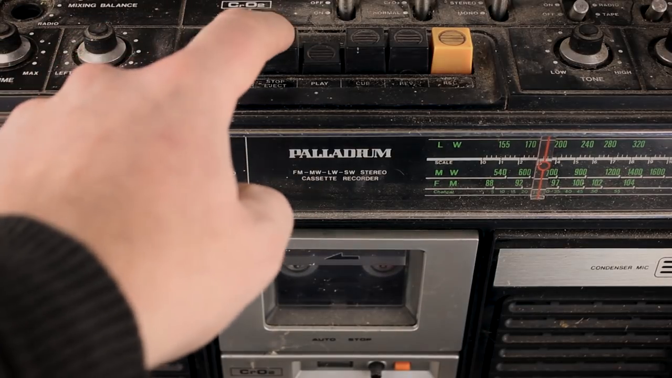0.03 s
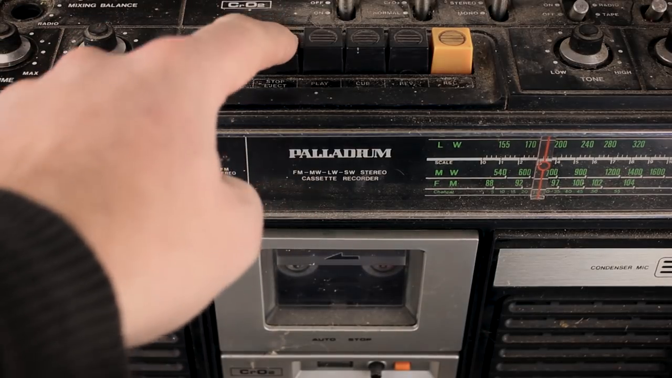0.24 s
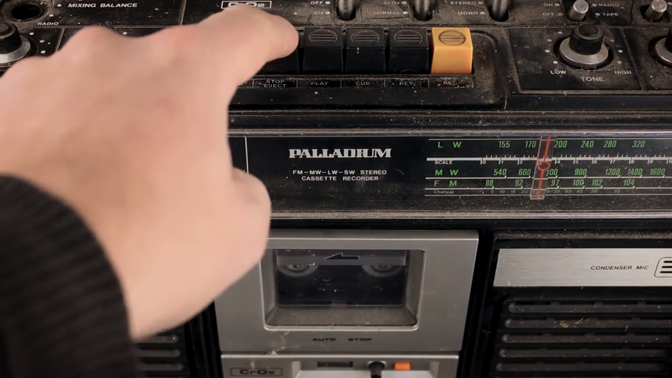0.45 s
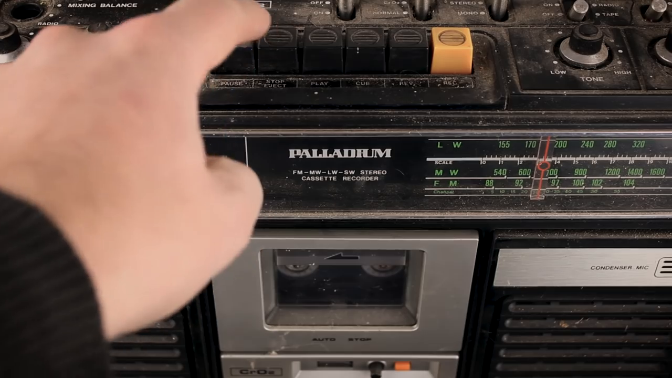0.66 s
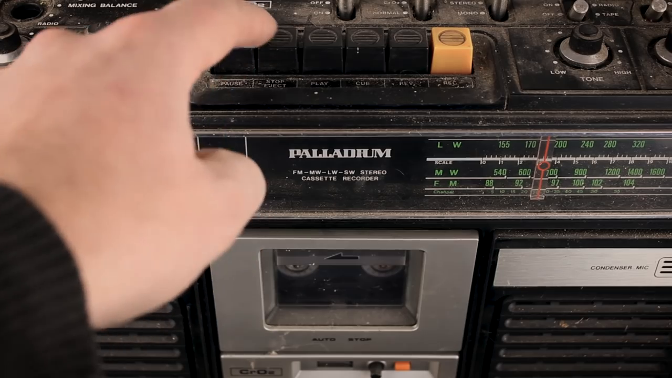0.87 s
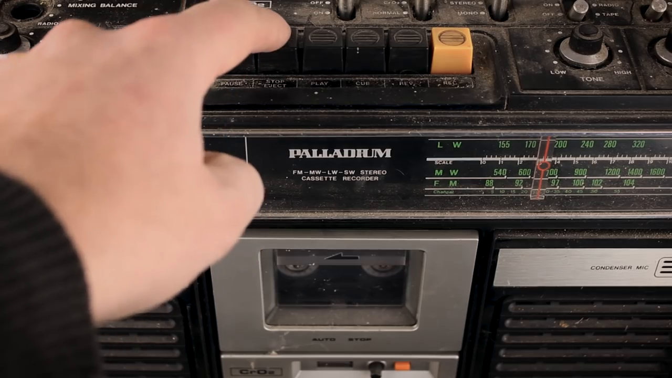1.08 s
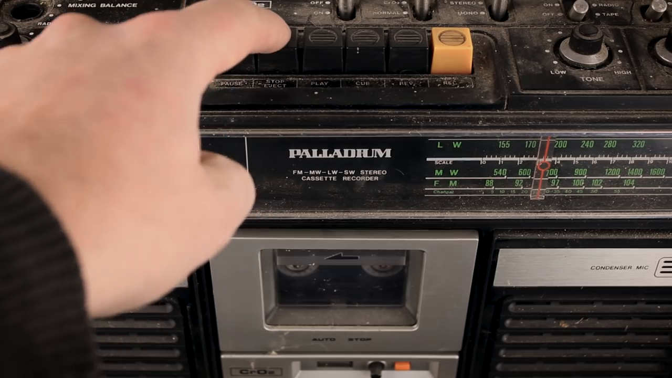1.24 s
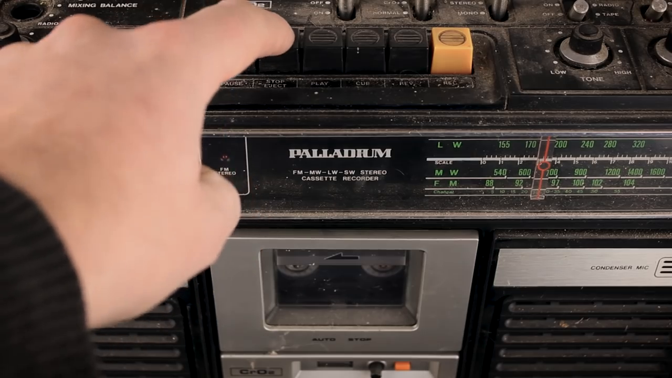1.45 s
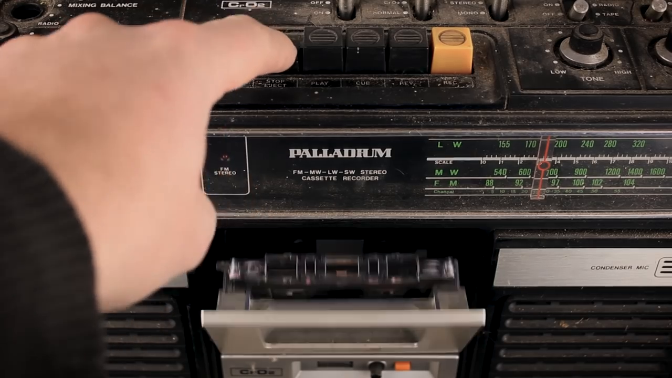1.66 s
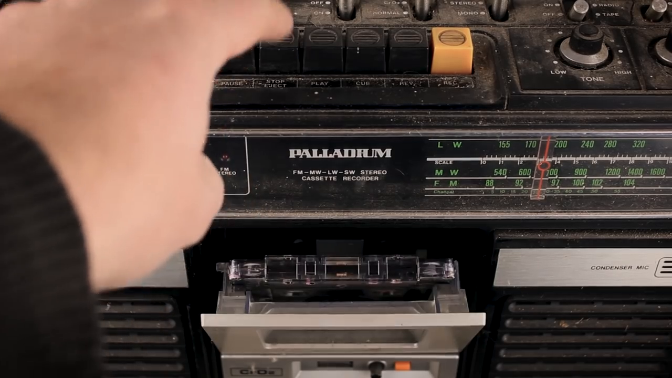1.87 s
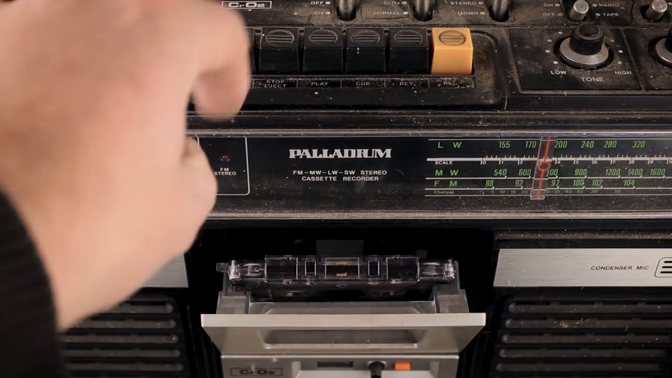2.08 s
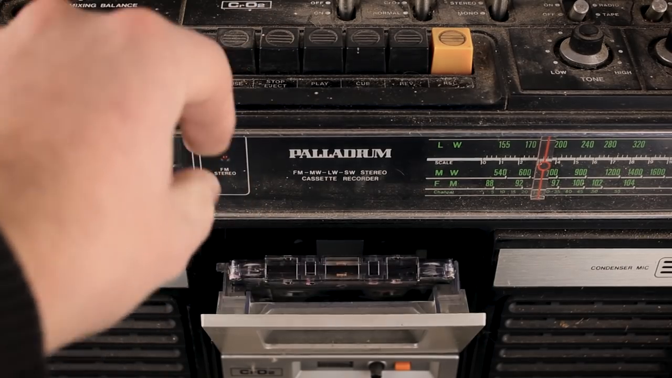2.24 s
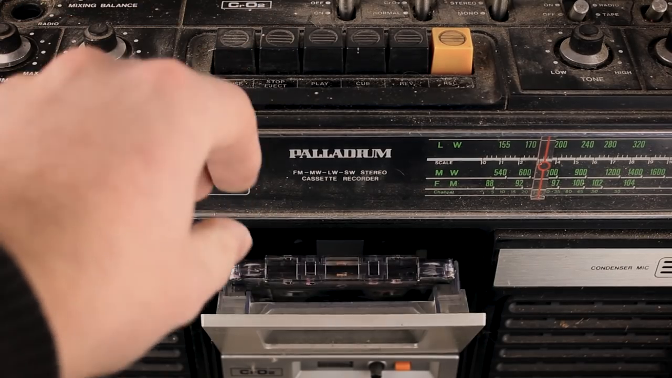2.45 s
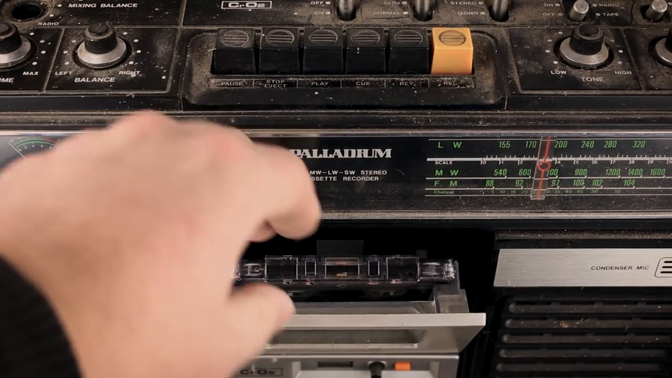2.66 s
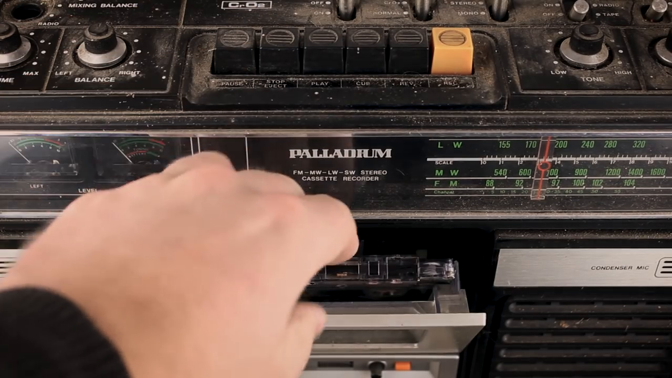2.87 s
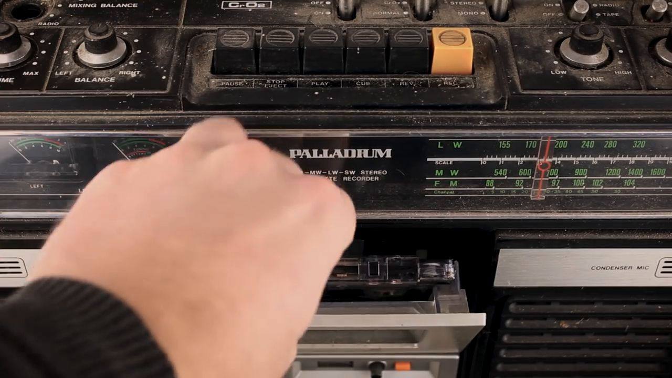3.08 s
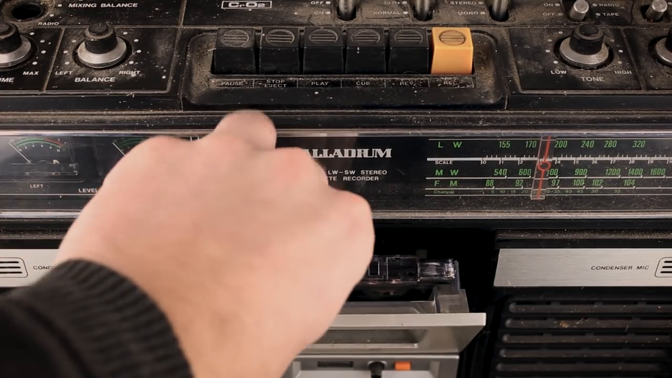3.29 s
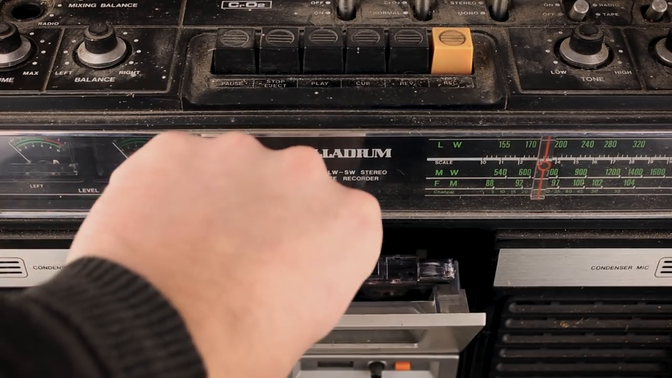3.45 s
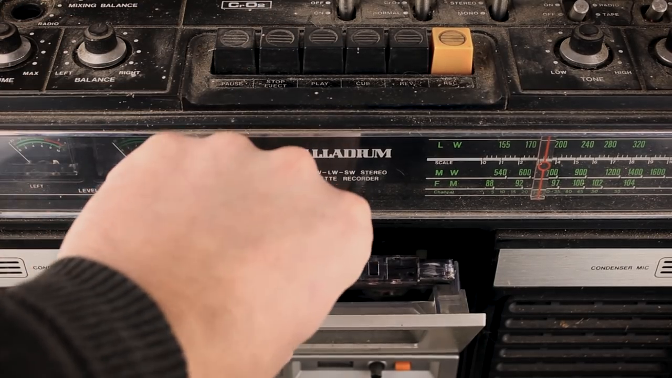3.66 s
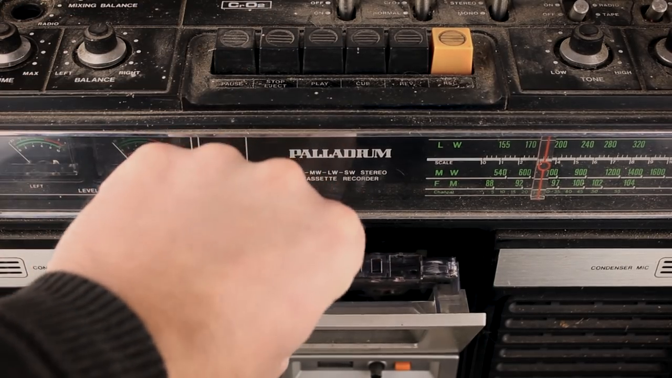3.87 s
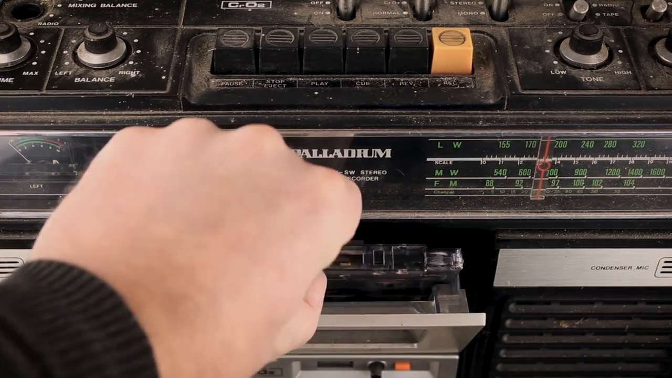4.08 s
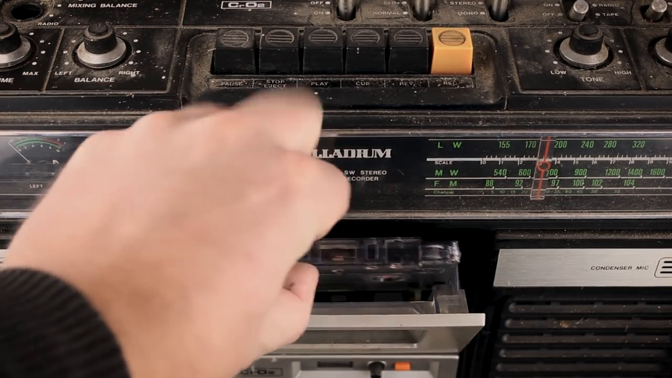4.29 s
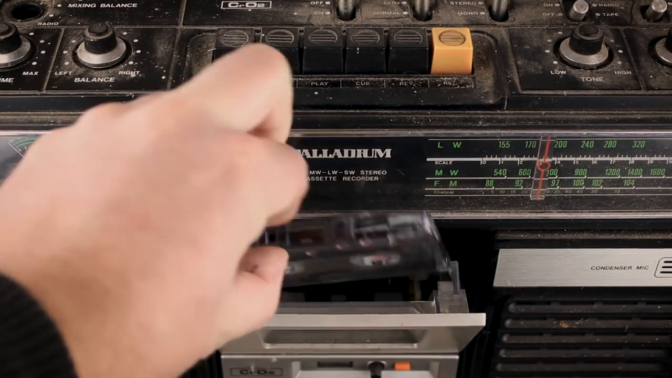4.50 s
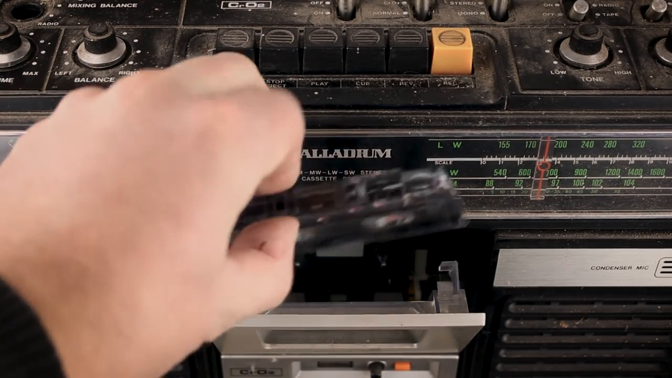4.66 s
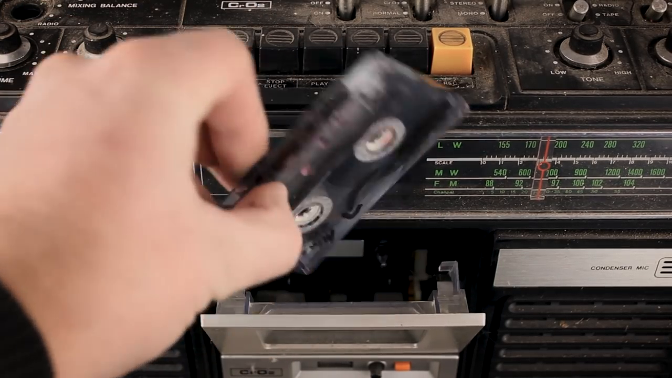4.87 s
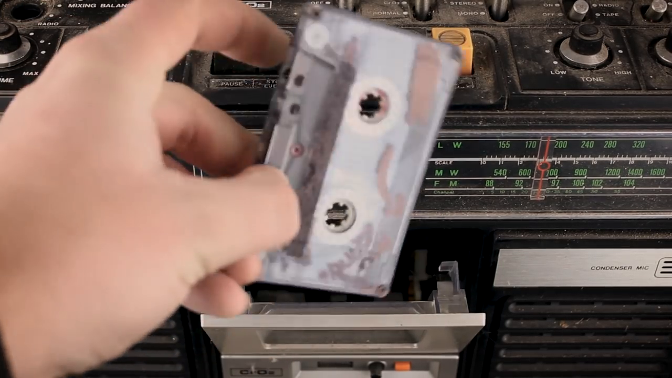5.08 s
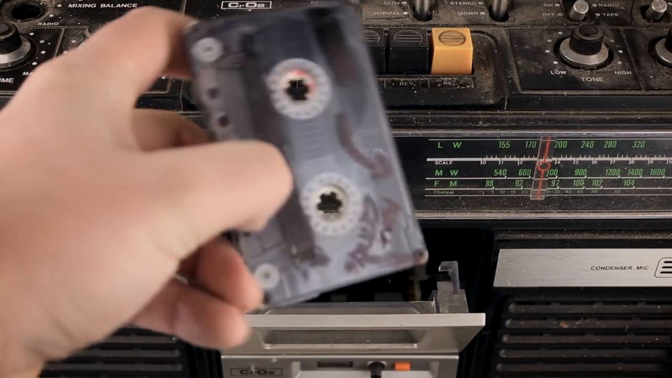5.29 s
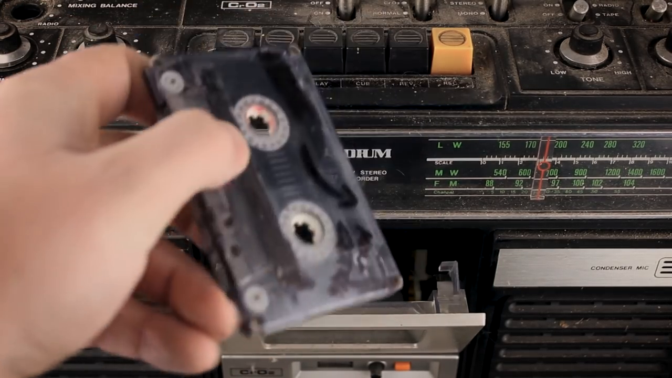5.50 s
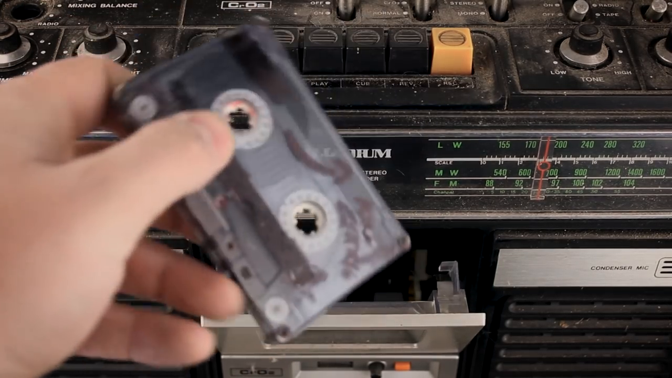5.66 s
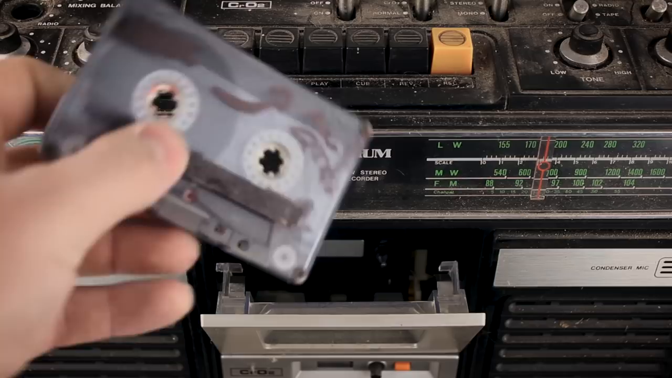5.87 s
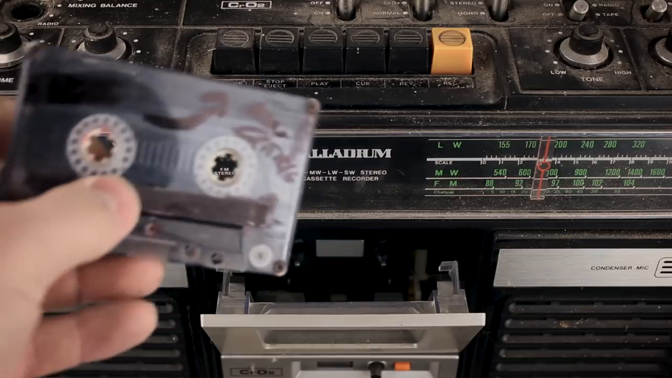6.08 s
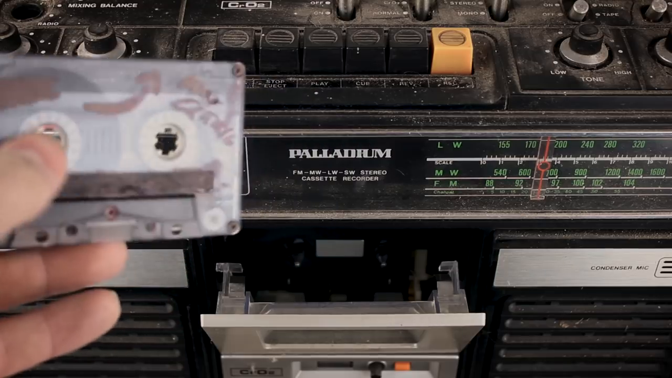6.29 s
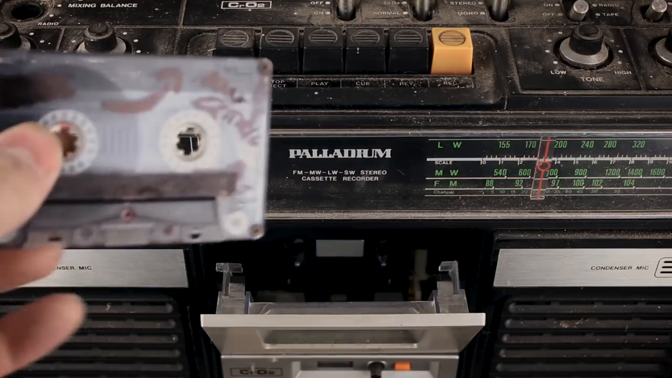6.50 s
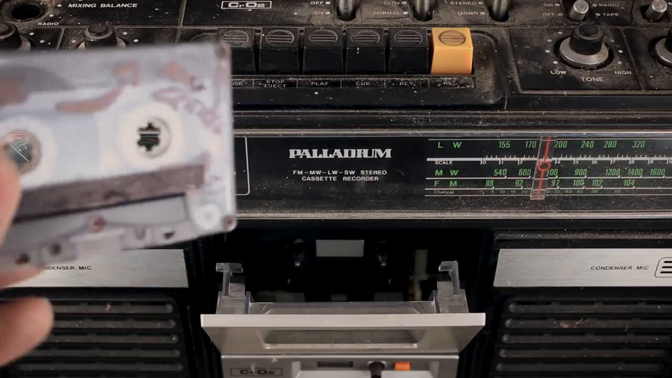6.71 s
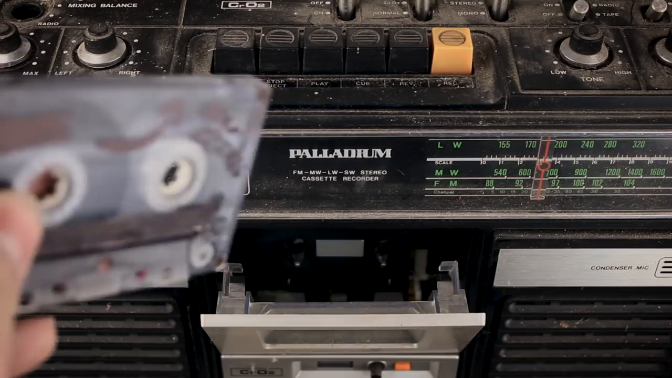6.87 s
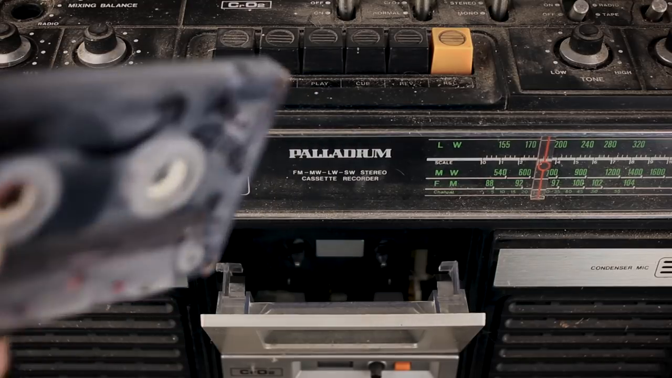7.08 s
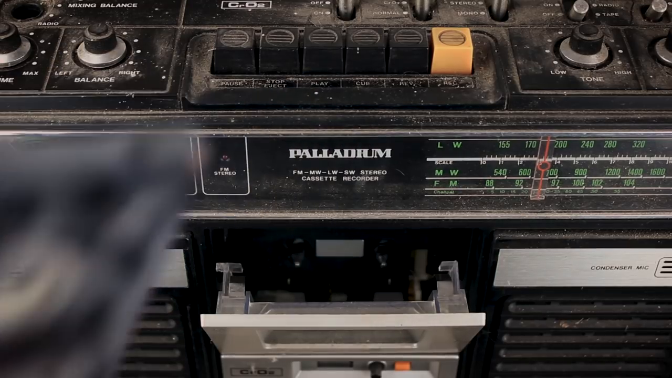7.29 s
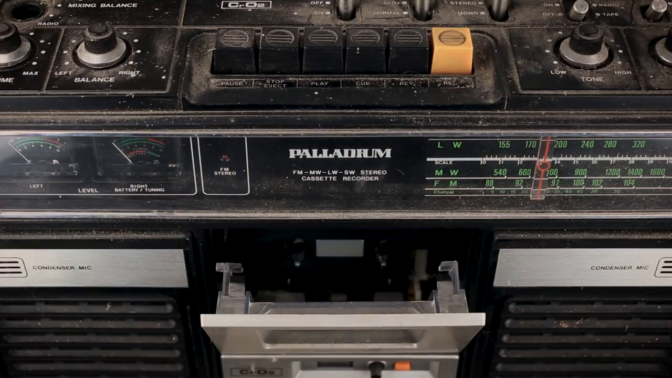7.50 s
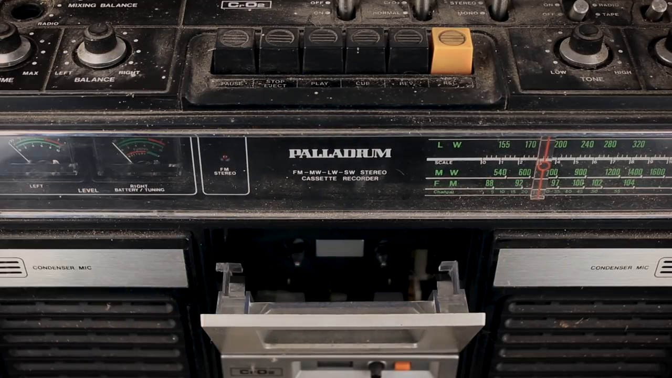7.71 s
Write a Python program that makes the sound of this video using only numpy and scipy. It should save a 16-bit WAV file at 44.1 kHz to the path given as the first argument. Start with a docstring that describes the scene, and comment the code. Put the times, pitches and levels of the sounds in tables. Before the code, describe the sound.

A key on a portable cassette recorder clicks down and releases. A second later the latch trips and the door springs open with a hollow plastic clack, leaving springs ringing faintly. The cassette knocks, scrapes and briefly squeals out of its holder. Fingers then rub softly on the shell, its loose hubs tick and a sleeve brushes past. Everything is close to the microphone in a small, quiet room.

```python
"""A portable cassette recorder, close to one microphone in a small, quiet room. A key is pressed and
let go, the latch trips and the door springs open with a clack; springs in the mechanism ring on
faintly. Fingers catch the cassette, which scrapes, squeals and knocks its way out of the holder.
Turned in the hand, its shell rubs on the skin and its loose hubs tick; a sleeve brushes past."""
import sys
import numpy as np
from scipy import signal
from scipy.fft import rfft, irfft, next_fast_len
from scipy.io import wavfile

SR = 44100
rng = np.random.default_rng(int(sys.argv[2]) if len(sys.argv) > 2 else 0)


def master(y):
    """Save y as 16-bit WAV."""
    cut = np.clip(np.atleast_2d(y).T, -1, 1)
    pcm = np.round(cut * 32767)  # scale
    wavfile.write(sys.argv[1], SR, pcm.astype(np.int16))


N = 341533


def undb(db):
    """Decibels to gain."""
    return 10 ** (np.asarray(db) / 20)


def fade(t, t60):
    """Free decay, 60 dB down after t60 seconds."""
    return np.exp(-np.log(1000) * t / t60)


def colour(x, points):
    """Shape the spectrum of x by (Hz, dB) points and give it an rms of 1."""
    hz, db = np.transpose(points)
    size = next_fast_len(len(x), True)
    f = np.maximum(np.arange(size // 2 + 1) * SR / size, 1)
    gain = undb(np.interp(np.log(f), np.log(hz), db))
    y = irfft(rfft(x, size) * gain, size)[:len(x)]
    return y / y.std()


def resonate(x, body, gain_db):
    """The direct sound plus a body's resonances, both scaled by gain_db."""
    rings = sum(undb(db) * signal.lfilter(*signal.iirpeak(hz, hz / width, fs=SR), x)
                for hz, width, db in body)
    return undb(gain_db) * (x + rings)


def add(track, s, sound):
    """Mix a sound in at s seconds."""
    start = max(int(s * SR), 0)
    track[start:start + len(sound)] += sound[:N - start]


def room_tone(level_db=-63):
    """The steady low hush of the still room."""
    # Each row: frequency in Hz, level in dB.
    spectrum = [(42, -23), (62, 8.5), (85, -14), (150, 1), (290, -1.5), (440, 1.5), (750, -5), (1700, -7),
                (13000, -12), (16000, -18)]
    return undb(level_db) * colour(rng.standard_normal(N), spectrum)


def drag(start, length, attack_s=0.0047, t60=0.11):
    """Gain of one push: it takes hold quickly, holds, and dies away when the push ends."""
    t = np.arange(N) / SR - start
    return np.clip(t / attack_s, 0, 1) * fade(np.clip(t - length, 0, 1), t60)


def friction(spectrum, rate, spread_db):
    """Tiny slips of uneven size, rate of them a second."""
    slips = (rng.random(N) < rate / SR) * rng.standard_normal(N)
    sizes = undb(spread_db * np.clip(rng.standard_normal(N), -2, 2))
    return colour(slips * sizes, spectrum)


def waver(rate, depth_db):
    """A gain that wanders to a new level about rate times a second."""
    turns = np.cumsum(rng.exponential(1 / rate, int(2 * rate * N / SR)))
    levels = 2 * rng.random(len(turns)) - 1
    return undb(depth_db * np.interp(np.arange(N) / SR, turns, levels))


def slide(rows, rate, spread_db, catch_db):
    """Plastic dragged over plastic catches and lets go, scraping and shaking the cabinet."""
    # Spectra of the scrape and the cabinet's judder. Each row: frequency in Hz, level in dB.
    scrape_colour = [(200, -21), (800, 3.5), (2000, 4.5), (9500, -5.5), (16000, -13)]
    judder_colour = [(30, -37), (90, -36), (140, -4.5), (270, -3), (370, 1.5), (460, 4.5), (700, -7),
                     (3000, -46)]
    pushes = np.array([drag(start, length) for start, length, _, _ in rows])
    scrape_db, judder_db = np.transpose(rows)[2:]
    scrape = undb(scrape_db) @ pushes * friction(scrape_colour, rate, spread_db)
    judder = undb(judder_db) @ pushes * friction(judder_colour, rate, spread_db)
    return (scrape + judder) * waver(rate=90, depth_db=catch_db)


def soften(spectrum, edge_db, hard_hz=21970, db_per_octave=11.5):
    """A soft contact, such as a fingertip, takes the treble out of a knock."""
    corner_hz = hard_hz * 2 ** (edge_db / db_per_octave)
    return [(hz, db - 10 * np.log10(1 + (hz / corner_hz) ** 4)) for hz, db in spectrum]


def ring(modes, tone, t, db_per_octave=10):
    """A body's modes ring freely, weaker the further they lie from the tone of the struck spot."""
    hz, width, db = np.transpose(modes)[:, :, None]
    gain = undb(db - db_per_octave * np.abs(np.log2(hz / tone))) * np.sqrt(width) / 10
    waves = np.sin(2 * np.pi * (hz * t + rng.random(hz.shape)))
    return np.sum(gain * np.exp(-np.pi * width * t) * waves, axis=0)


def hollow(t, centre_hz=404.3, spread=0.0892, t60=0.34, count=3):
    """The hollow note of the cabinet: every blow finds other close modes, which beat as they fade."""
    hz = centre_hz * (1 + spread * rng.standard_normal((count, 1)))
    waves = np.sin(2 * np.pi * (hz * t + rng.random((count, 1))))
    return np.mean(waves, axis=0) * fade(t, t60)


def blows(hits, modes, ring_db, contact_s, crack_db, boom_db, thump_db, hollow_db, boom_t60, thump_t60):
    """Each contact cracks and rings in the plastic; its bass booms and thumps in the cabinet."""
    # Spectra of a blow's four parts, low to high. Each row: frequency in Hz, level in dB.
    boom_colour = [(40, -38), (90, -22), (115, -14), (140, 7), (200, -8), (400, -27.5), (2000, -75)]
    thump_colour = [(40, -44.5), (150, -8), (280, -3.5), (360, 0), (650, -1.5), (1200, -32.5),
                    (4000, -59.5)]
    knock_colour = [(200, -16), (550, -4), (1800, 0.5), (3200, -2.5), (5500, -4), (8500, -11.5),
                    (16000, -35)]
    edge_colour = [(1500, -22), (5000, -6.5), (7500, 0.5), (13000, 0.5), (16000, -5)]
    out, t = np.zeros(N), np.arange(16384) / SR
    push = 1 - np.exp(-t / contact_s)
    crack = undb(crack_db) * fade(t, t60=0.0019)
    for s, db, bass, edge, t60, tone in hits:
        parts = [(boom_colour, undb(bass + boom_db) * fade(t, boom_t60)),
                 (thump_colour, undb(bass + thump_db) * fade(t, thump_t60)),
                 (soften(knock_colour, edge), fade(t, t60)),
                 (edge_colour, undb(edge + 5) * (fade(t, t60) + crack))]
        # crowded modes blur into noise
        clatter = sum(colour(rng.standard_normal(len(t)), points) * decay for points, decay in parts)
        ringing = undb(ring_db) * ring(modes, tone, t) + undb(bass + hollow_db) * hollow(t)
        struck_spot = [(tone, tone / 3, 0)]  # a broad resonance around its tone
        add(out, s, resonate(push * (clatter + ringing), struck_spot, db))
    return out


def deck():
    """Key, latch and door slide and strike, ringing the cabinet."""
    # Each row: start in seconds, level, bass and edge in dB, ring t60 in seconds, spot tone in Hz.
    hits = [(.1244, -26, -16, -4, 0.052, 2420), (.2102, -17, -20.5, 0, 0.029, 13700),
            (.2153, -14, -29, -4, 0.025, 13500), (.2212, -16, -34, 0.5, 0.033, 4600),
            (.4986, -23, -42, 2, 0.046, 2060), (.504, -20.5, -19.5, -12, 0.057, 1076),
            (1.538, -33.5, -15.5, -12.5, 0.06, 3320), (1.5785, -38, -6, -14, 0.047, 2870),
            (1.6035, -16.5, -22, 0.5, 0.037, 3230), (1.6451, -19.5, -10.5, 0, 0.015, 550),
            (1.648, -13.5, -34, 1.5, 0.019, 3050), (1.651, -16, -31, 3, 0.022, 1410),
            (1.707, -25, -7, -5.5, 0.041, 1870), (1.829, -33, -15, -8.5, 0.081, 7000),
            (1.842, -35, -31, -19, 0.18, 3390), (1.8631, -21.5, -18, -5.5, 0.058, 8400)]
    # Cabinet resonances. Each row: frequency and width in Hz, level in dB.
    body = [(338, 38, -1.5), (418.4, 23, -3.5), (1099, 40, -3), (1378, 50, -9.5), (1620, 140, -7.5),
            (3415, 83, -13), (4500, 400, -5.5), (12300, 90, -7), (13200, 1200, -2)]
    # Key, latch and hinge moving. Each row: start and length in seconds, scrape and judder in dB.
    travels = [(.105, 0.029, -49.5, -54), (.36, 0.22, -50, -55.5), (1.584, 0.025, -40, -45.5),
               (1.6, 0.032, -25, -33), (1.715, 0.054, -35.5, -40.5)]
    clacks = blows(hits, body, ring_db=-6, contact_s=0.0002, crack_db=-1,
                   boom_db=-2.5, thump_db=-5.5, hollow_db=-1, boom_t60=0.09, thump_t60=0.18)
    sliding = slide(travels, rate=6000, spread_db=1.5, catch_db=3)
    return resonate(clacks + sliding, body, gain_db=-5.5)


def springs():
    """The mechanism's springs and panels sing on after key and door; each note wavers as it fades."""
    # Each row: start in seconds, pitch in Hz, level in dB, t60 in seconds.
    notes = [(0.214, 429, -55, 2.9), (0.26, 111, -52, 1), (0.69, 248, -63, 2.34), (0.57, 355, -63.5, 4.8),
             (1.65, 139, -46, 0.64), (1.649, 355, -60, 5.5), (1.648, 428, -49, 1.95),
             (1.649, 1000, -64, 2.9)]
    out, t = np.zeros(N), np.arange(131072) / SR
    for s, hz, db, t60 in notes:
        note = undb(db) * np.sin(2 * np.pi * hz * t) * fade(t, t60)
        add(out, s, note * waver(rate=10, depth_db=2)[:len(t)])
    return out


def pitched_bursts(rows, q):
    """Rough bursts, each at its own pitch: a stick-slip squeal or, when very short, a tick."""
    out = np.zeros(N)
    for start, length, hz, db in rows:
        song = signal.lfilter(*signal.iirpeak(hz, q, fs=SR), rng.standard_normal(N))
        out += undb(db) * drag(start, length) * song / song.std()
    return out


def tick_and_squeaks():
    """A faint tick sounds just before the latch trips; a fingertip squeaks on the cassette's shell."""
    # The tick, then the squeaks. Each row: start and length in seconds, pitch in Hz, level in dB.
    bursts = [(1.487, .008, 3180, -56), (2.925, .03, 2780, -60.5), (5.868, .025, 2820, -57),
              (5.935, 0.037, 2730, -58), (6.328, 0.015, 2340, -61)]
    return pitched_bursts(bursts, q=17)


def strokes(rows):
    """Gain of soft strokes: each speeds up and slows down in a bell shape."""
    t = np.arange(N) / SR
    return sum(undb(db) * np.exp(-np.minimum((2 * (t - middle) / length) ** 2, 20))
               for middle, length, db in rows)


def sleeve():
    """Cloth brushes past as the arm moves."""
    # Each row: middle and length in seconds, level in dB.
    brushes = [(2.27, 0.26, -64.5), (6.74, 0.17, -45), (6.81, 0.055, -43.5), (7.73, 0.43, -56.5)]
    # The cloth's spectrum. Each row: frequency in Hz, level in dB.
    cloth = [(300, -15), (1100, -2.5), (7000, 4.5), (12000, 4.5), (16000, -3.5)]
    return strokes(brushes) * friction(cloth, rate=15000, spread_db=-2)


def in_hand():
    """The shell slips between the fingers and the loose hubs tick inside it."""
    # Each row: start in seconds, level, bass and edge in dB, ring t60 in seconds, spot tone in Hz.
    hub_ticks = [(5.381, -35, -8.5, -15, 0.055, 1950), (5.392, -38, -35, -4, 0.035, 2100),
                 (5.707, -40, -32, -16, 0.047, 1420), (5.854, -39.5, -24, 3, 0.021, 1520),
                 (6.413, -44, -31, -1, 0.021, 810), (6.418, -39, -24, -4, 0.036, 3380),
                 (7.571, -44.5, -14, -34, 0.03, 1110)]
    # Resonances of the shell held free. Each row: frequency and width in Hz, level in dB.
    shell = [(808, 42, -7), (2080, 52, -6), (2400, 74, -9), (2820, 200, -1.5), (5620, 210, -3)]
    # Each row: middle and length in seconds, level in dB.
    rubs = [(2.945, 0.057, -57), (4.972, 0.04, -52.5), (5.07, 0.71, -58.5), (5.44, 0.11, -57),
            (5.515, 0.065, -52.5), (5.70, 0.09, -49), (5.89, 0.22, -55.5), (5.955, 0.043, -50.5),
            (6.23, 0.08, -50.5), (6.36, 0.13, -54), (7.065, 0.053, -59)]
    # The spectrum of rubbed skin. Each row: frequency in Hz, level in dB.
    skin = [(300, -28), (1100, -3), (2500, -1), (8000, -2.5), (11000, 1), (16000, -8.5)]
    ticks = blows(hub_ticks, shell, ring_db=-1, contact_s=0.00063, crack_db=4,
                  boom_db=-8.5, thump_db=-9, hollow_db=-30, boom_t60=0.061, thump_t60=0.17)
    rubbing = undb(1.5) * strokes(rubs) * friction(skin, rate=3500, spread_db=-0.5)
    return resonate(ticks + rubbing, shell, gain_db=-2.5)


def cassette():
    """The shell knocks, scrapes and judders out of the holder, squealing where its edge binds."""
    # Each row: start in seconds, level, bass and edge in dB, ring t60 in seconds, spot tone in Hz.
    hits = [(3.085, -28, -11.5, -18, 0.024, 1005), (3.183, -27.5, -4.5, -9.5, 0.076, 2400),
            (3.304, -45, -7, -11, 0.059, 2580), (3.450, -41.5, -7.5, -12, 0.021, 2770),
            (3.587, -41, -6, -43, 0.065, 605), (3.773, -33.5, 1, -2.5, 0.037, 1900),
            (3.916, -41.5, 7, -6, 0.043, 2400), (3.931, -40, -13, -6.5, 0.037, 4560),
            (3.991, -38, 2, -10.5, 0.078, 3060), (4.033, -36, -11, -16, 0.05, 1400),
            (4.196, -47, -16, 5.5, 0.028, 3400), (4.218, -35.5, 0, -4, 0.04, 2210),
            (4.232, -38, -17, 1, 0.031, 2300), (4.248, -34, 2, -4, 0.036, 2310),
            (4.2635, -24.5, -5, -5.5, 0.06, 2400), (4.281, -30, -4, 4, 0.035, 8100),
            (4.291, -27.5, -7, -4.5, 0.064, 9900), (4.3965, -26, 1, -2, 0.044, 9900),
            (4.463, -21, -1.5, -29, 0.093, 870), (4.474, -23.5, -10, -5, 0.045, 3400),
            (4.4995, -17.5, -23, -4, 0.022, 4800), (4.503, -17.5, -33, -4.5, 0.028, 2280),
            (4.614, -20.5, -0.5, -19, 0.069, 1570), (4.671, -34, -20, -16, 0.11, 1050),
            (4.734, -30, -30, -32, 0.039, 1560), (4.8105, -19, -17, -23, 0.049, 3000),
            (4.827, -26, -16.5, -29, 0.031, 2090), (4.879, -30, -44, -12, 0.048, 1680)]
    # Resonances of the cassette in its holder. Each row: frequency and width in Hz, level in dB.
    body = [(373, 18, -3.5), (425, 31, 2.5), (1020, 250, -5), (1430, 110, -10.5), (1653, 42, -7),
            (2357, 24, -9), (3053, 100, -3.5), (3420, 40, -21), (4870, 140, -12.5), (10200, 400, -2.5)]
    # Each row: start and length in seconds, scrape and judder in dB.
    tugs = [(3.174, 0.19, -53.5, -53), (3.62, 0.38, -57, -54), (3.94, 0.066, -45, -50),
            (4.05, 0.32, -48.5, -53), (4.228, 0.046, -35.5, -44.5), (4.272, 0.037, -35, -37.5),
            (4.316, 0.029, -39, -31.5), (4.388, 0.022, -29, -39), (4.62, 0.029, -34, -40),
            (4.693, 0.054, -33.5, -44.5), (4.83, 0.06, -40.5, -54.5)]
    # Each row: start and length in seconds, pitch in Hz, level in dB.
    squeals = [(4.23, .07, 2270, -41), (4.286, .008, 10250, -36)]
    knocks = blows(hits, body, ring_db=-3, contact_s=0.00082, crack_db=4,
                   boom_db=-16, thump_db=-9, hollow_db=-11, boom_t60=0.24, thump_t60=0.21)
    scraping = undb(-3.5) * slide(tugs, rate=1400, spread_db=0, catch_db=4)
    return resonate(knocks + scraping + pitched_bursts(squeals, q=28), body, gain_db=-5)


def reflections(x, gap_s=0.00064, build_s=0.0021, size=65536, bands=16):
    """Diffuse sound off the near walls builds up after a short gap and fades band by band."""
    # Each row: frequency in Hz, t60 in seconds, level in dB.
    decays = [(129, 0.94, -2), (411.4, 0.46, -1.5), (1188, 0.43, -3), (7850, 0.39, -9), (14980, 0.22, -11)]
    hz, t60, db = np.transpose(decays)
    t, f = np.arange(size) / SR, np.arange(size // 2 + 1) * SR / size
    centres = np.geomspace(80, 16000, bands)
    noise, tail = rfft(rng.standard_normal(size)), np.zeros(size)
    for centre, pick in zip(centres, np.eye(bands)):
        band_t60, band_db = (np.interp(np.log(centre), np.log(hz), column) for column in (t60, db))
        band = irfft(noise * np.interp(f, centres, pick))
        shape = fade(t, band_t60) * np.clip((t - gap_s) / build_s, 0, 1)
        tail += undb(band_db) * band * shape / np.linalg.norm(shape)
    return signal.fftconvolve(x, tail)[:N]


def scene():
    """Machine and hand close to the microphone, with the small room behind them."""
    # The room's standing waves. Each row: frequency and width in Hz, level in dB.
    room_modes = [(112.6, 3.9, -3), (140.4, 9.6, 3.5)]
    machine = deck() + cassette() + springs()
    hand = in_hand() + tick_and_squeaks() + sleeve()
    walls = reflections(machine + undb(-0.5) * hand)  # the hand is nearer and so drier
    walls += reflections(deck() + cassette())  # the cabinet's back sends out its own mix of modes
    return (machine + hand + resonate(walls, room_modes, gain_db=-2.5) + room_tone())[None]


def record(dry, low_cut_hz=45, top_hz=15900):
    """The deep bass below the low cut is taken away; the microphone chain ends the very top."""
    thin = signal.sosfilt(signal.butter(3, low_cut_hz, "highpass", fs=SR, output="sos"), dry)
    return signal.sosfilt(signal.ellip(10, .2, 75, top_hz, fs=SR, output="sos"), thin)


dry = scene()
out = record(dry)
master(out)
```